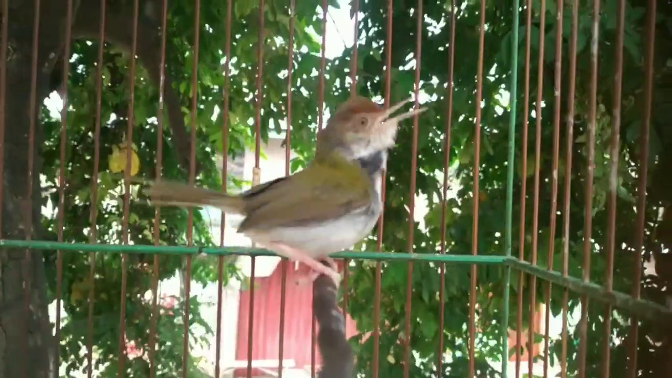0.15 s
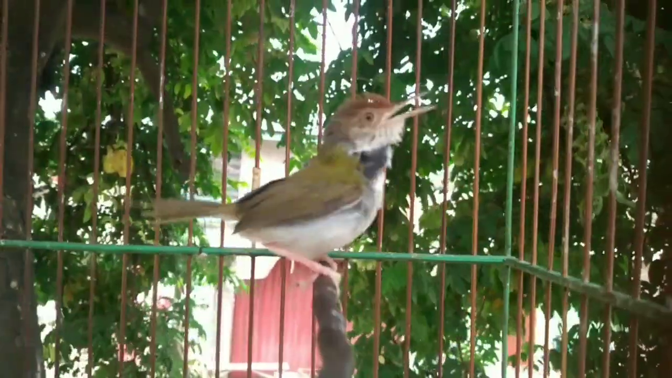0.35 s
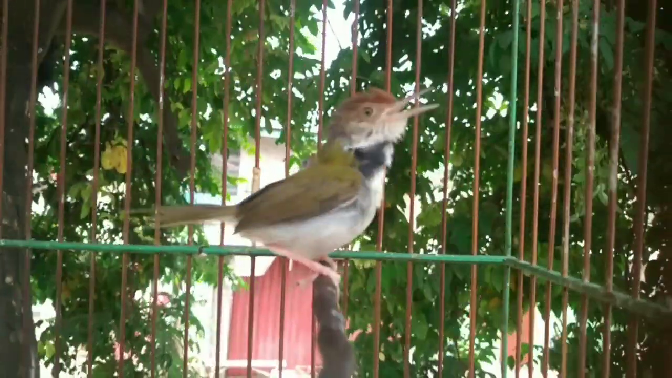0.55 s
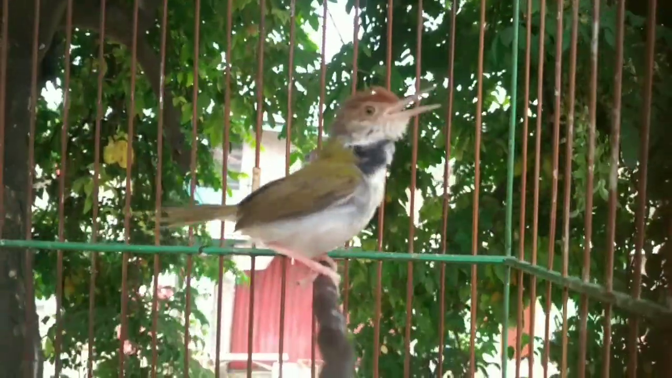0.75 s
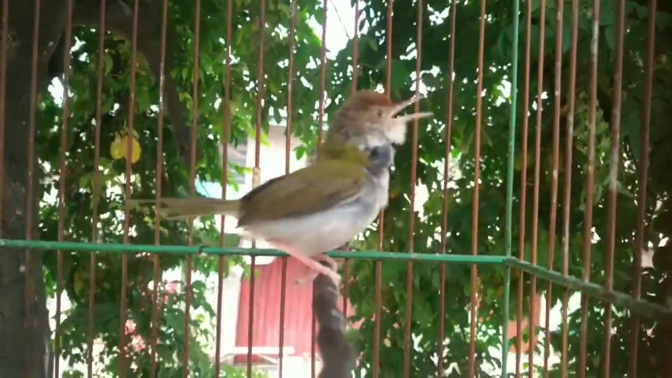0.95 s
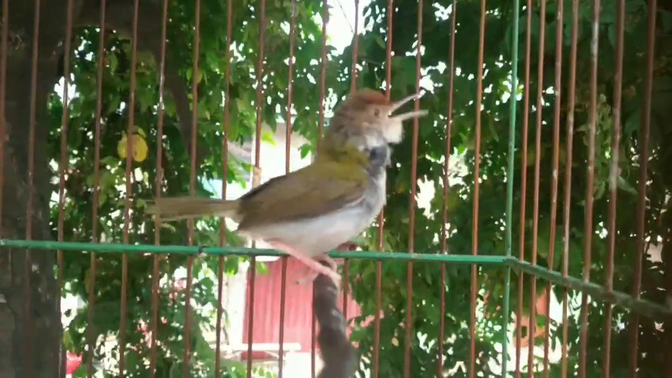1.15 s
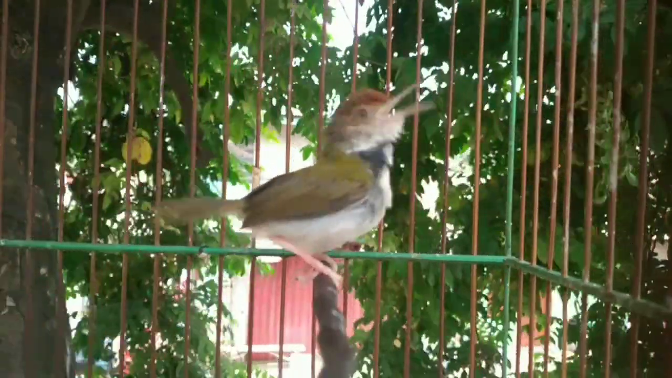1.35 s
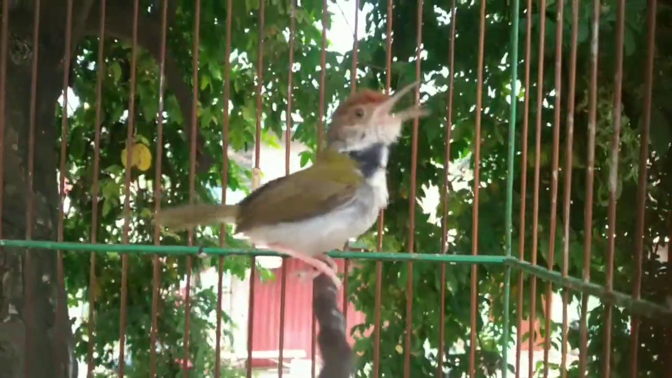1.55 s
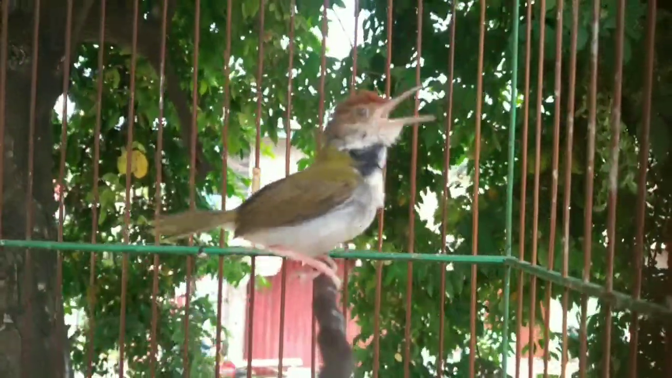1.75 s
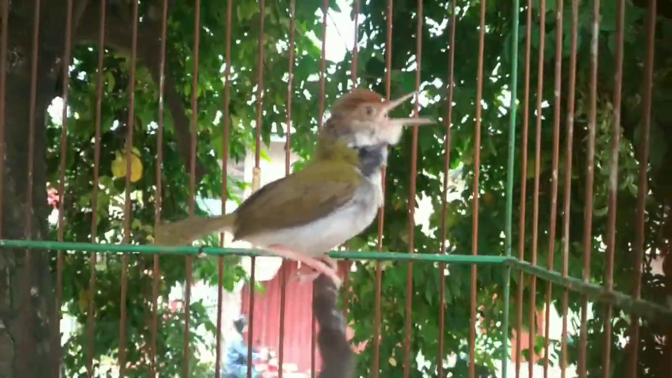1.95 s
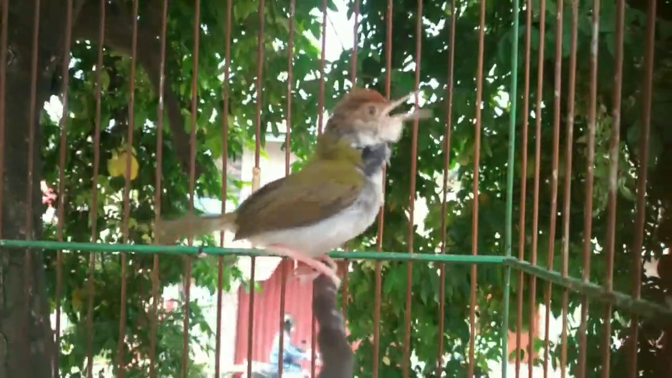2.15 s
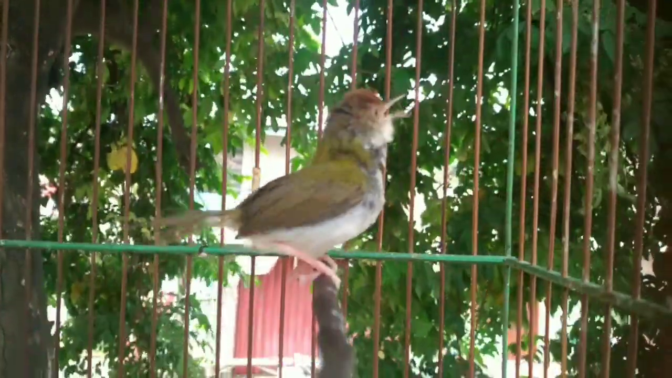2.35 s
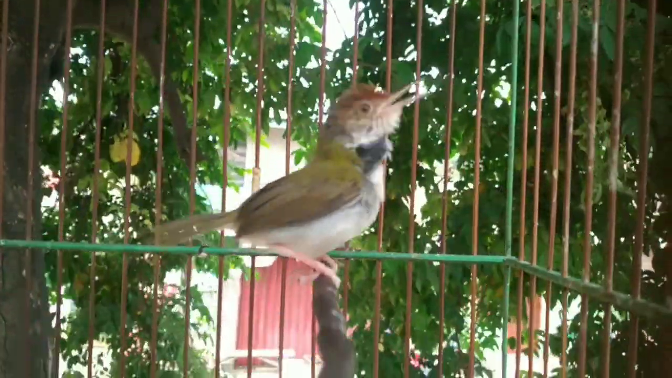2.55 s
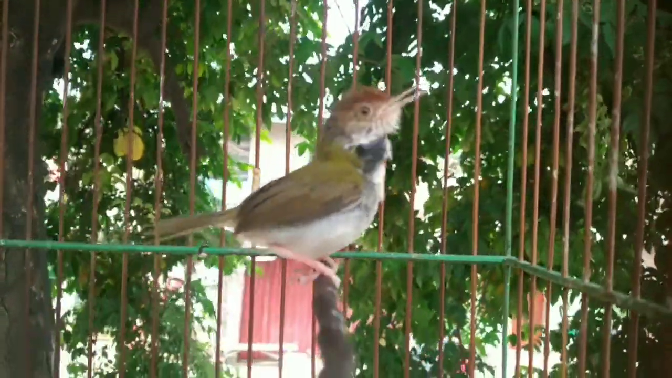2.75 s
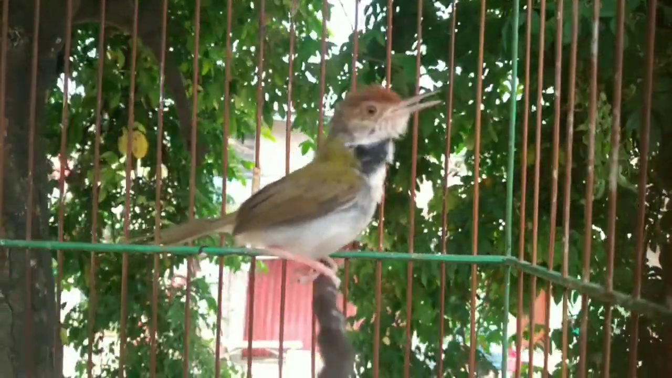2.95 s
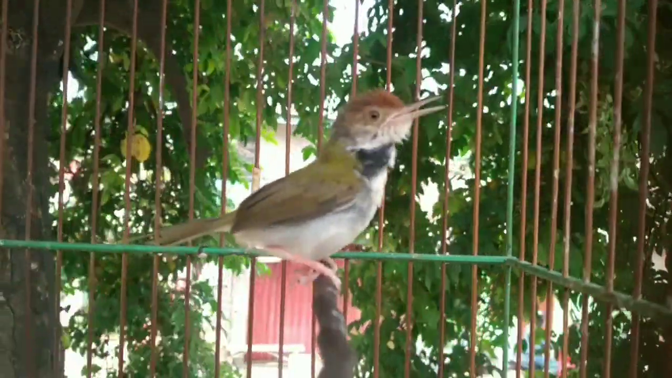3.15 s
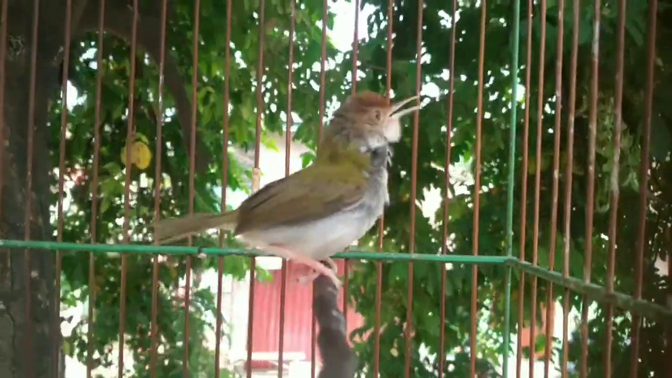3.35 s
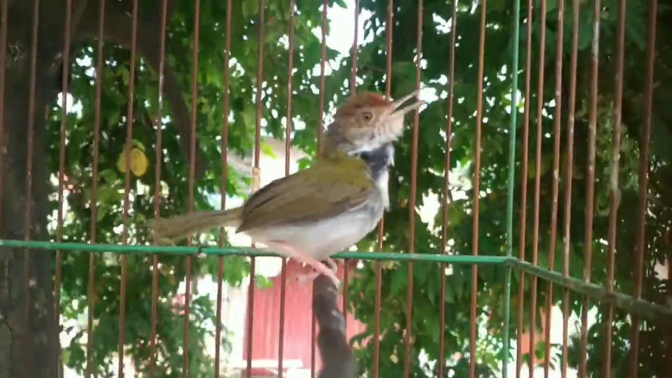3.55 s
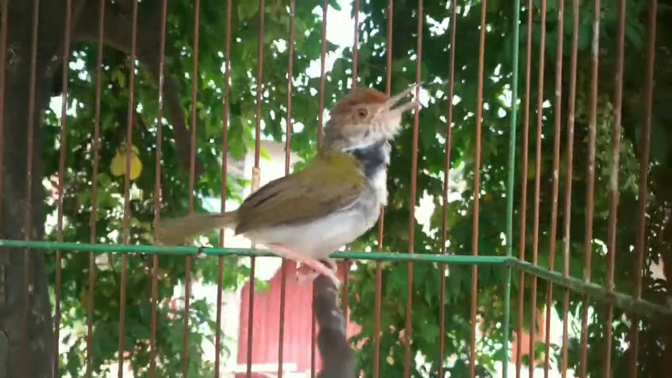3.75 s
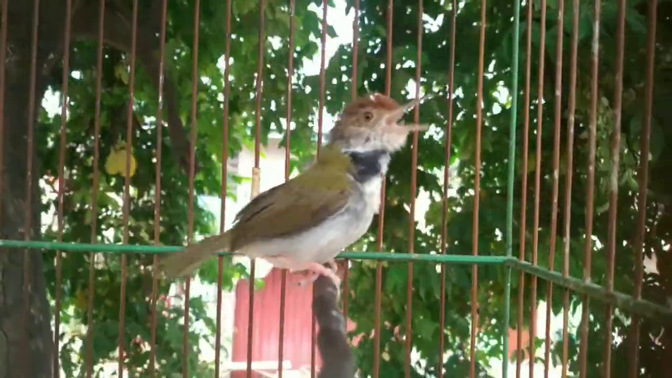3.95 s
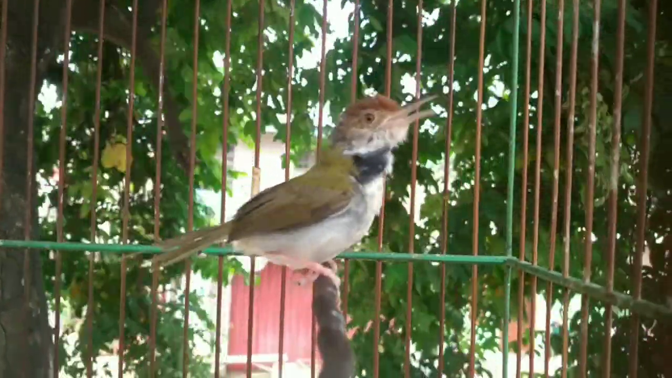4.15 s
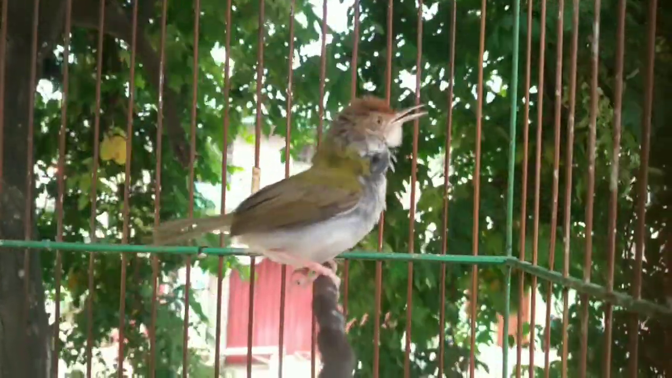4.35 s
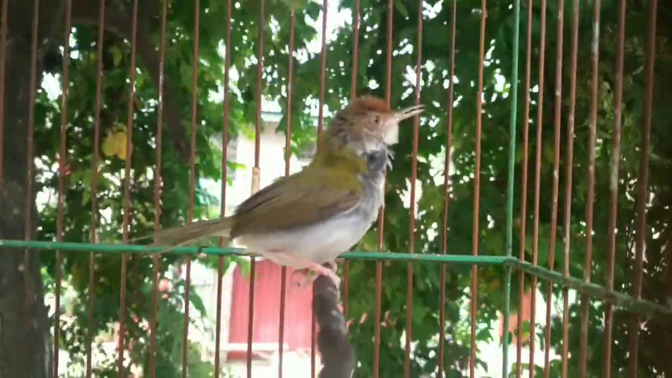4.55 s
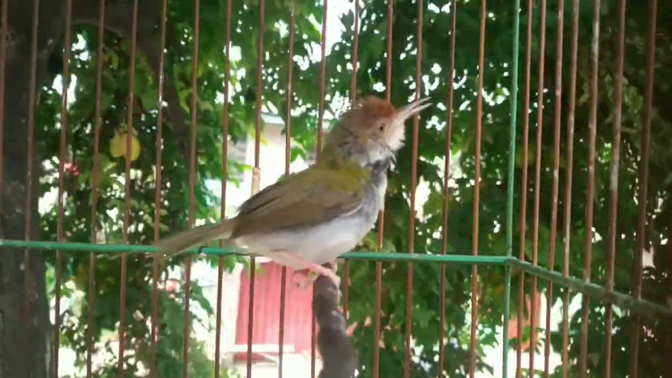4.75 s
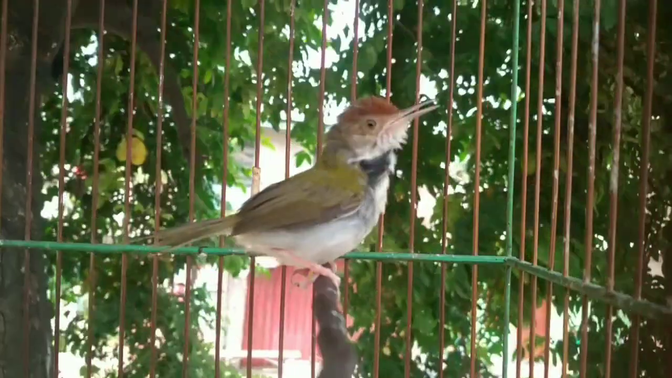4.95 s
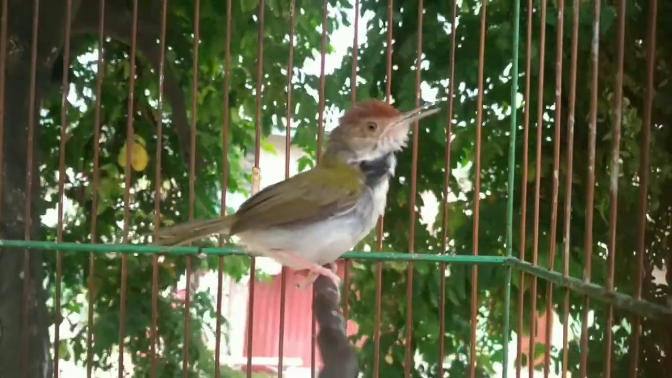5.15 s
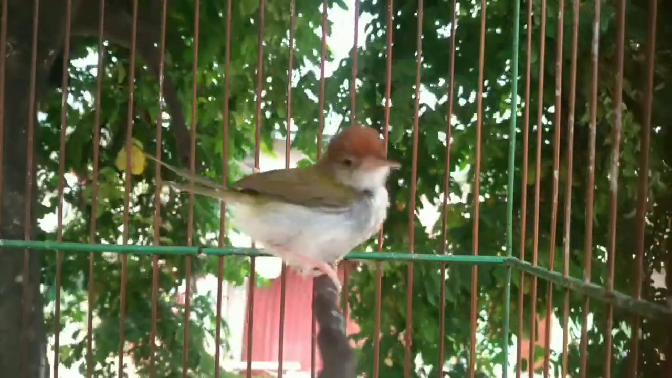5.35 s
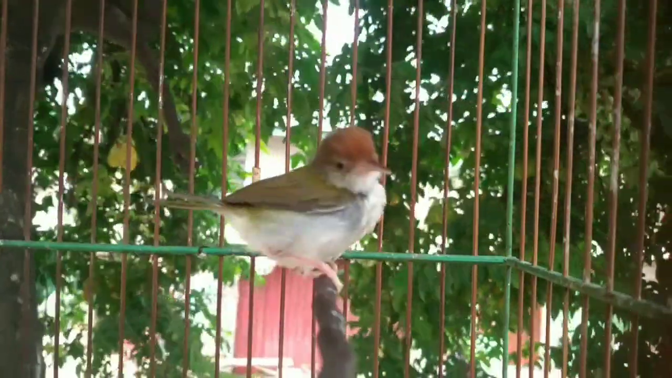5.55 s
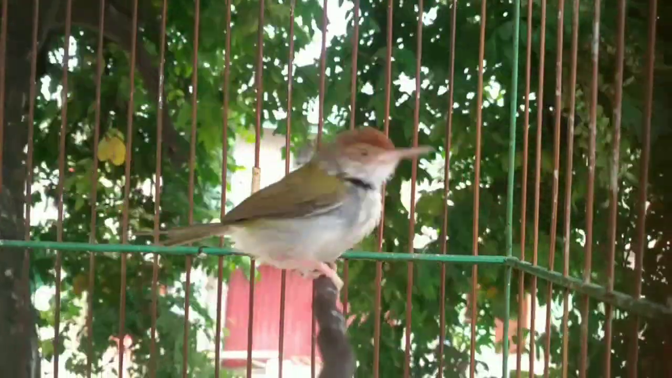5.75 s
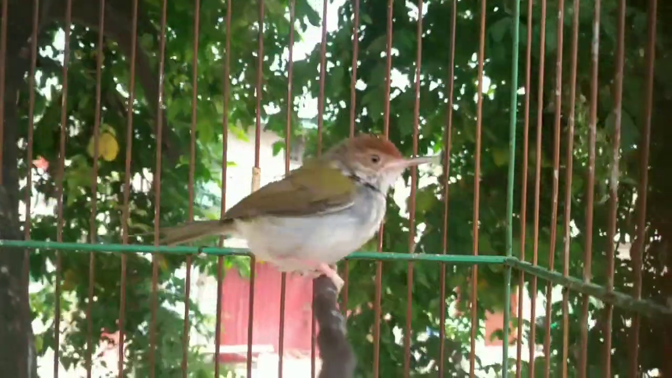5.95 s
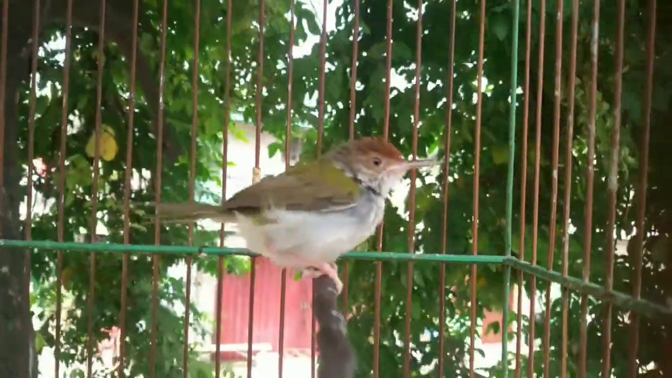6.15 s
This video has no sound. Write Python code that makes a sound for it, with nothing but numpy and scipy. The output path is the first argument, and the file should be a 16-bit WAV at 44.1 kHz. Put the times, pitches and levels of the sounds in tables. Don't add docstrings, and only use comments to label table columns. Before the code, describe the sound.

A small songbird in a cage sings very close to a phone microphone: loud, sharp rising whistles, evenly repeated almost five per second, slightly clipped, with a short garden echo. Far behind, a one-cylinder motorbike putters past and fades over low town hum, with faint fowl calls and thin insect hiss. After about five seconds the song stops, wind buffets the microphone and the bird's feet scuff the perch.

```python
import sys
import numpy as np
from scipy import signal
from scipy.fft import rfft, irfft, next_fast_len
from scipy.io import wavfile
from scipy.ndimage import uniform_filter1d

SR = 44100
rng = np.random.default_rng(int(sys.argv[2]) if len(sys.argv) > 2 else 0)


def volts(x):
    e = np.asarray(x, float) / 20
    return 10 ** e


def wav_out(sig):
    wavfile.write(sys.argv[1], SR, np.round(np.clip(np.atleast_2d(sig).T, -1, 1) * 32767).astype(np.int16))


N = 277246
T = np.arange(N) / SR


def level(x, db):
    return x * volts(db) / np.sqrt(np.mean(x ** 2))


def shape(x, response):
    size = next_fast_len(x.shape[-1] + SR // 10)
    hz = np.arange(size // 2 + 1) * SR / size + 0.0011
    return irfft(rfft(x, size) * response(hz), size)[..., :x.shape[-1]]


def band(hz, width_hz):
    return lambda f: 1 / (1 + 1j * (f / hz - hz / f) * hz / width_hz)


def walk(rate_hz, size=N):
    hold = int(SR / rate_hz)
    steps = np.repeat(rng.standard_normal(size // hold + 1), hold)
    return 1.3 * uniform_filter1d(uniform_filter1d(steps, hold), hold)[:size]


def note(ms, mid, low_hz, top_hz, db, open_db, shift, hook):
    glide = [(0, -0.15), (.15, 0), (.3, .115), (.45, .21), (.55, .33), (.65, 0.56), (.76, .85), (.88, 0.99),
             (1, 0.85)]
    # share of length, level in dB, how much of the opening level applies 0-1.
    effort = [(0, -22.5, 0.86), (.055, -11.5, 1), (.12, -4, 1), (.35, -2, 0.85), (.58, 2, 0.14),
              (.73, -0.03, 0.14), (.9, 1.5, 0.28), (.96, -3.5, 0.06), (1, -14.5, 0.2)]
    # multiple of whistle, level in dB, share where it fades.
    partials = [(1.5, -31, 0.35), (2, -54, 0.19), (2.001, -46, 1.6), (3.001, -48.5, 0.65), (3.5, -44, 0.44),
                (4, -53, .3)]
    length = ms * SR / 1000
    share = np.interp(np.arange(int(length)) / length, [0, mid, 1], [0, .62, 1])
    size = len(share)

    rise = np.interp(share, *np.transpose(glide)) - hook * np.clip((share - .87) / 0.15, 0, 1) ** 1.9
    rise = uniform_filter1d(rise, size=150)
    tremor = 1 + 0.0019 * walk(180, size=size) + 0.0017 * walk(45, size=size)
    phase = 2 * np.pi * np.cumsum((low_hz + (top_hz - low_hz) * rise) * tremor) / SR

    at, effort_db, opening = np.transpose(effort)
    at = at + shift * np.sin(np.pi * at) ** 4
    push_db = np.interp(share, at, effort_db + open_db * opening) + 0.95 * walk(150, size=size)
    upper = 0
    for multiple, partial_db, end in partials:
        upper = upper + volts(partial_db) * np.sin(multiple * phase) / (1 + np.exp((share - end) / 0.12))
    upper_gain = volts(db + np.interp(share, at, effort_db) + walk(200, size=size))
    edge = np.sin(np.pi / 2 * np.clip(np.minimum(share, 1 - share) / 0.025, 0, 1)) ** 2

    breath = shape(rng.standard_normal(size), lambda f: band(3800, 2600)(f) ** 3)
    breath *= volts(-41.0) * (1 + 5.5 * np.exp(-share / 0.04048)) * np.clip(share / 0.0089, 0, 1)
    tone = volts(db + push_db) * np.sin(phase) + upper_gain * upper
    return edge * tone + breath * np.clip(1 - share / .5, 0, 1)


def bird():
    # start in seconds, length in ms, share of length at mid-rise, top in Hz, level in dB.
    song_notes = [(0.1152, 78.5, 0.56, 3964, 2), (0.3195, 80, .56, 3950, 3.5),
                  (0.5267, 77.4, 0.6, 3978, 3.5), (0.7294, 78.6, .61, 3977, 5), (0.9371, 78, 0.58, 3938, 4),
                  (1.143, 76.5, 0.5546, 3845, 2.5), (1.3495, 80.2, 0.55, 3854, 2.5),
                  (1.5607, 82.4, 0.584, 3907, 3), (1.7721, 79.1, 0.587, 3930, 3.5),
                  (1.982, 81.5, 0.57, 3854, 2.5), (2.195, 80.6, 0.558, 3913, 2.5),
                  (2.404, 79.3, .59, 3913, 1.5), (2.618, 83.3, .53, 3819, 2.5),
                  (2.8381, 79.9, 0.57, 3842, 3), (3.056, 85.2, .56, 3836, 3.5),
                  (3.2866, 77.2, 0.56, 3840, 3.5), (3.5087, 79, 0.5647, 3820, 2.5),
                  (3.7286, 83, 0.56, 3787, 3.5), (3.962, 82.2, 0.56, 3855, 3),
                  (4.1893, 80.6, 0.57, 3820, 3), (4.4085, 81, .57, 3818, 2.54),
                  (4.6322, 79, 0.56, 3764, 2.5), (4.8589, 79.3, 0.54, 3830, 2.5),
                  (5.0938, 78.2, 0.55, 3745, 2.5)]
    earlier_note = (-.083, 78, .59, 3930, 4.0)
    path_ms = [.113, 1.043, 2.177, 3.56, 8.37]
    path_gain = [-0.29, -0.185, -0.15, -0.075, -0.0047]
    # t60 in seconds, level in dB, first arrival in ms.
    garden = [(0.092, -19, 5.2), (.24, -33.5, 25), (0.548, -35, 4.1)]
    lead = 8820
    song, turned = np.zeros((2, N + lead + SR))
    for s, ms, mid, top_hz, db in [earlier_note] + song_notes:
        fresh = np.exp(-s / 1.3)
        hook = 0.1073 * (1 + max(s / 6.8, 0) ** 3)
        sound = note(ms, mid, 2660 + 120 * fresh, top_hz, db, -6 + 2.57 * fresh, 0.0085 * s, hook)
        span = slice(lead + int(s * SR), lead + int(s * SR) + len(sound))
        song[span] += sound
        swing_db = 2.0 + 2 * np.cos(2 * np.pi * (s - .76) / .92) - 1.36 * s
        late = np.clip(np.linspace(-7.0, 3.0, len(sound)), 0, 1)
        turned[span] += sound * volts(0.82 + swing_db * late)

    def round_case(f):
        paths = sum(g * np.exp(-2j * np.pi * f * ms / 1000) for ms, g in zip(path_ms, path_gain))
        return paths / (1 + (f / 4700) ** 10)

    left = shape(turned, round_case)
    t = np.arange(SR // 2) / SR
    tail = 0
    for t60, db, first_ms in garden:
        decay = volts(-60 * t / t60 + 2.0 * walk(79, size=len(t))) * (t > first_ms / 1000)
        tail = tail + level(rng.standard_normal((2, len(t))) * decay, db)
    tail = shape(tail, lambda f: (0.58 + 0.64 * band(3850, 700)(f)) / (1 + (f / 7000) ** 4))
    tail /= np.sqrt(len(t))
    echo = signal.fftconvolve(song[None], tail, axes=1)[:, :len(song)] * volts([[-3.0], [0]])
    return (np.array([left, song]) + echo)[:, lead:lead + N]


def bike():
    # time in seconds, level in dB.
    pass_by = [(0, -36), (0.799, -34), (2.299, -32.5), (3.3, -35.5), (4.2, -40.5), (5.25, -41)]
    exhaust = [-16.5, 2.5, -26.5, -3, -3.5, -7, -5.5, -10.5, -15.5, -12.5, -9.5, -14, -22.5, -20, -25.5,
               -33.5]
    # time in seconds, firing rate in Hz.
    firing = [(0, 19.4), (.45, 19.5), (1.0, 21.75), (1.5, 21.85), (2.15, 22.05), (2.5, 20.75), (3.3, 20.6),
              (4.0, 20.3), (6.29, 20.9)]
    # time in seconds, centre in Hz.
    ground_lift = [(.5, 107), (.8, 148), (1.9, 130), (2.5, 148), (3.0, 132), (3.3, 92), (4.0, 102)]
    step = 21
    t = T[::step]
    hz = np.interp(t, *np.transpose(firing))
    count = np.arange(1, len(exhaust) + 1)[:, None]
    lift_hz = np.interp(t, *np.transpose(ground_lift))
    lift_db = 9.0 * np.exp(-((count * hz - lift_hz) / 16) ** 2)
    lift_db += 5.6 * np.exp(-((count * hz - 255) / 25) ** 2)
    waver_db = 1.8 * np.array([walk(2 * step, size=len(t)) for _ in count])
    phase = count * (2 * np.pi * np.cumsum(hz) * step / SR)
    phase = phase + 0.093 * count ** 2 / 4
    gain = volts(np.array(exhaust)[:, None] + lift_db + waver_db)
    thumps = (gain * np.sin(phase)).sum(axis=0)
    thumps = signal.resample_poly(thumps, step, 1)[:N]
    s, db = np.transpose(pass_by)
    away_db = np.interp(T, s, db) - 11.6 * np.clip(T - s[-1], 0, 2)
    return level(thumps, .4) * volts(away_db + np.array([[1.6], [-1.6]]))


def air():
    # frequency in Hz, density in dB per Hz.
    spectrum = [(15, -30), (25, 6.5), (44, 3.5), (60, -3), (123, -1), (225, -13.5), (278, -18.5),
                (481, -27.5), (833, -30.5), (975, -38.5), (2310, -36.5), (3160, -41.5), (7500, -58),
                (9250, -50.5), (13000, -76.5)]
    # frequency in Hz, left minus right in dB.
    pan = [(60, -5.5), (110, 1.5), (200, -1.5), (380, -1), (700, 2.5), (1290, -0.5), (2380, 0.5),
           (4400, -9.5), (8120, -10), (15000, -12.5)]
    # time in seconds, swell in dB.
    town = [(0, -55), (1.2, -49), (2.2, -49.5), (3.8, -49.5), (5.0, -55), (6.29, -55)]
    out = 0
    swell_db = np.interp(T, *np.transpose(town)) + 58
    early_share = np.clip((4.5 - T) / 3.0, 0, 1)
    sides = np.array([[1], [-1]])
    for hz in 28 * 2 ** np.arange(0, 8.8, .5):
        noise = rng.standard_normal((2, N))
        mid, side = shape(noise, lambda f: band(hz, hz / 2)(f) ** 2 / (1 + (f / 11500) ** 16))
        table_hz, table_db = np.transpose(spectrum)
        db = np.interp(np.log(hz), np.log(table_hz), table_db)
        table_hz, table_db = np.transpose(pan)
        pan_db = np.interp(np.log(hz), np.log(table_hz), table_db)
        apart = np.clip(0.079 + hz / 900, 0, 1)
        db = db + swell_db / (1 + (hz / 3000) ** 2 + (250 / hz) ** 2)
        db = db - 1.23 * early_share * (hz < 280) + 1.1 * walk(4.6)
        out = out + volts(db + sides * pan_db / 2) * (mid + apart * side * sides)
    return level(out, -35)


def insects():
    hiss = shape(rng.standard_normal((2, N)), lambda f: band(9200, 1800)(f) ** 2)
    return level(hiss, -74.5) * volts(3.5 * walk(14) + 1.0 * walk(0.68) + np.array([[-10.0], [0]]))


def wind():
    # peak time in seconds, level in dB, rise and fall in seconds.
    gusts = [
        (3.92, -34.5, 0.17),
        (5.46, -27.5, 0.09),
        (5.66, -29, 0.058),
        (5.86, -40, .06),
        (6.2, -32.5, .3),
        (5.2, -41.5, 0.42),
    ]
    # time in seconds, peak in dB, pitch in Hz, length in ms.
    eddies = [(5.339, -22, 124.7, 20.9), (5.471, -9, 147.6, 11.5), (5.483, -25, 527.5, 8.5),
              (5.489, -16, 256, 12.6), (5.52, -18, 55, 56), (5.524, -21, 340, 5.8), (5.593, -14, 149, 3.48),
              (5.626, -25, 178.4, 17), (5.646, -12.5, 110, 15), (5.66, -23.5, 204, 22),
              (5.685, -23, 70.31, 30), (5.702, -30, 200, 12), (5.858, -19.5, 78.91, 24)]
    gain = volts(-56.5)
    for s, peak_db, spread_s in gusts:
        gain = gain + volts(peak_db) * np.exp(-((T - s) / spread_s) ** 2)
    db = 20 * np.log10(gain)
    ports = []
    for port_db, follow in ((2.0, 1.0), (-5.0, .6)):
        noise = shape(rng.standard_normal(N), lambda f: band(60, 130)(f) / (1 + (f / 260) ** 3))
        ports.append(level(noise, port_db) * volts(-45 + follow * (db + 43.0) + 3.0 * walk(22)))
    for s, peak_db, hz, ms in eddies:
        near = slice(int((s - .05) * SR), int((s + .05) * SR))
        t = T[near] - s
        swell = volts(peak_db) * np.exp(-(t / (ms / 2000)) ** 2)
        ports[0][near] += swell * np.cos(2 * np.pi * hz * t * (1 + 3.0 * t))
    return np.array(ports)


def fowl():
    # start in seconds, length in seconds, first pitch in Hz, last pitch in Hz, level in dB.
    calls = [
        (1.63, .14, 2150, 2135, -55.5),
        (2.903, 0.2, 618, 643, -46),
        (3.054, 0.193, 432, 464, -49.5),
        (3.079, 0.39, 637.9, 652, -52),
        (3.58, 0.27, 817, 755, -55.5),
        (3.793, 0.2, 774.2, 660, -46),
        (3.978, 0.14, 618.5, 555, -51),
        (5.062, .19, 377.5, 365.6, -45),
        (5.96, 0.2426, 468.3, 500, -56.5),
        (6.241, 0.036, 300, 297, -32),
    ]
    out = np.zeros(N)
    for s, length_s, first_hz, last_hz, db in calls:
        span = slice(int(s * SR), int((s + length_s) * SR))
        size = len(T[span])
        hz = np.linspace(first_hz, last_hz, size) * (1 + 0.0073 * walk(82, size=size))
        phase = 2 * np.pi * np.cumsum(hz) / SR
        gain = volts(db + 1.5 + 4.0 * walk(36, size=size)) * signal.windows.tukey(size, .6)
        out[span] += gain * (np.sin(phase) + volts(-22) * np.sin(2 * phase))
    t = np.arange(SR // 5) / SR
    yards = level(rng.standard_normal((2, len(t))) * volts(-60 * t / .3), -1.8) / np.sqrt(len(t))
    return out + .6 * signal.fftconvolve(out[None], yards, axes=1)[:, :N]


def perch():
    # start in seconds, level in dB, centre in Hz.
    scuffs = [
        (5.47, -67.5, 5300),
        (5.5, -54.5, 2700),
        (5.51, -64, 4000),
        (5.53, -74, 6000),
        (5.599, -60, 2700),
        (5.64, -63, 2596),
        (5.89, -62, 1845),
        (6.22, -67, 9550),
    ]
    out = np.zeros((2, N))
    t = np.arange(SR // 20) / SR
    for s, db, hz in scuffs:
        burst = shape(rng.standard_normal((2, len(t))), lambda f: band(hz, hz * .3)(f) ** 3)
        burst *= volts(-60 * t / 0.07463) * np.minimum(t / 0.002568, 1)
        out[:, int(s * SR):int(s * SR) + len(t)] += level(burst, db) * volts([[-4.0], [0]])
    return out


def scene():
    return bird() + bike() + air() + insects() + wind() + fowl() + perch()


def low_pass(x):
    return signal.sosfilt(signal.butter(12, 16770, fs=SR, output="sos"), x)


def record(dry):
    # frequency in Hz, level in dB.
    halo = [(300, -4), (1000, 1.5), (2300, -1.5), (3300, 11), (4400, -0.5), (6000, -2), (8000, 3),
            (11300, -8.5), (12800, -24), (14000, -7), (15300, -4.5)]
    flat = np.clip(signal.resample_poly(dry, 2, 1, axis=1), -.83, .85)
    flat = signal.resample_poly(flat, 1, 2, axis=1)
    loud = np.minimum(uniform_filter1d(np.abs(dry) ** 1.93, size=700, axis=1), 1)
    flat = flat * volts(.5 * loud * np.array([walk(260), walk(320)]))

    f, frames, cells = signal.stft(rng.standard_normal((2, N)), SR, nperseg=512)
    bands = (np.sqrt(f) / 7).astype(int)
    blocks = np.arange(len(frames)) // 4
    patch_db = -11.0 * rng.exponential(size=(2, bands[-1] + 1, blocks[-1] + 1))[:, bands][:, :, blocks]
    hz, db = np.transpose(halo)
    halo_db = np.interp(np.log(f + 1), np.log(hz), db)[:, None]
    left_dull_db = np.array([12.0, 0])[:, None, None] * (f > 4600)[:, None]
    grain = signal.istft(cells * volts(halo_db + patch_db - left_dull_db), SR)[1][:, :N]
    cut = shape(flat + level(grain, -33.0) * loud, lambda f: np.clip((15900 - f) / 500, 0, 1))
    return low_pass(cut)


dry = scene()
out = record(dry)
wav_out(out)
```